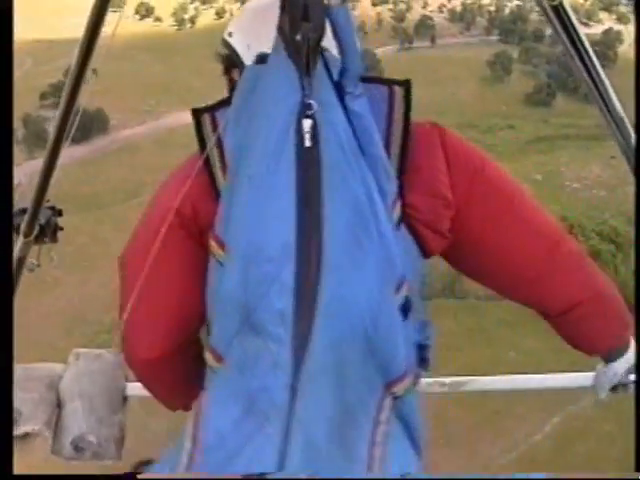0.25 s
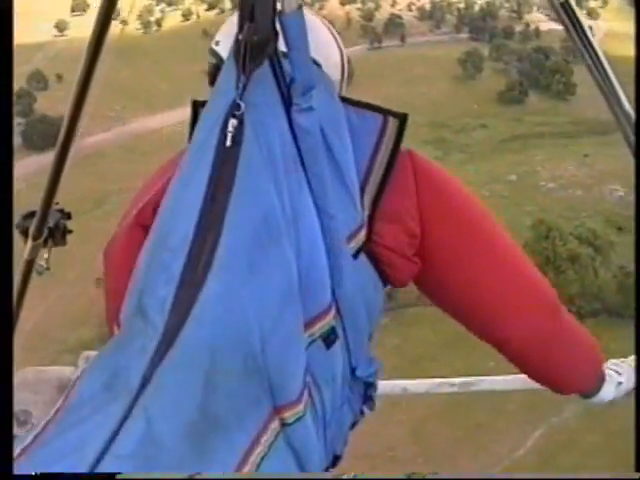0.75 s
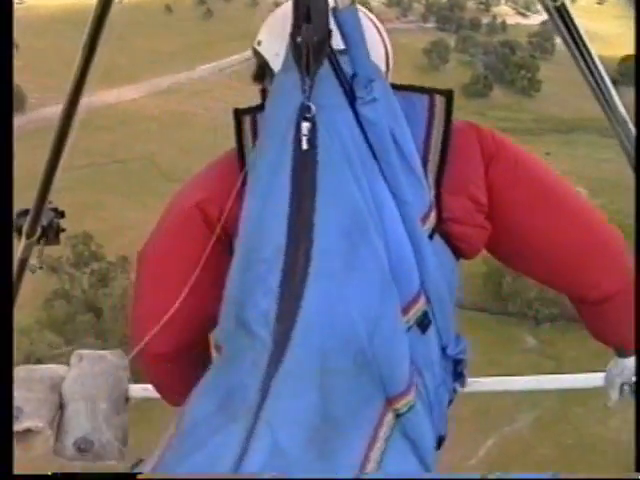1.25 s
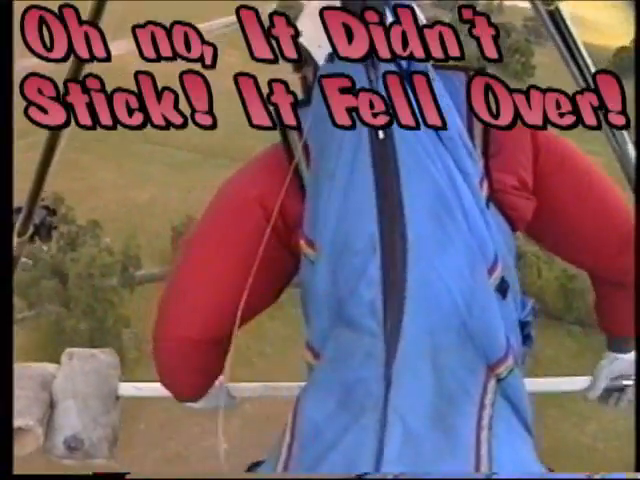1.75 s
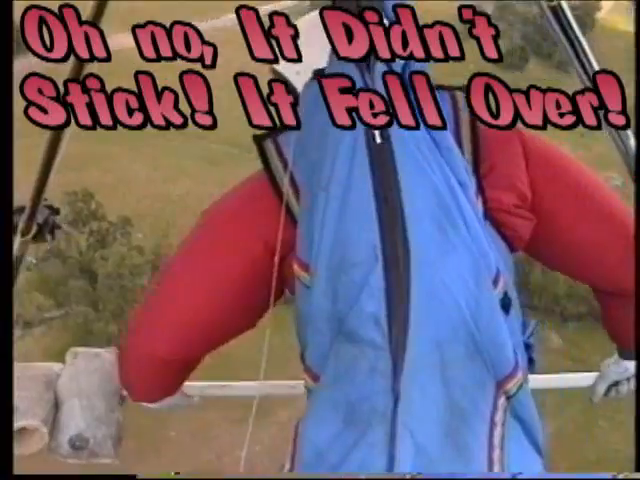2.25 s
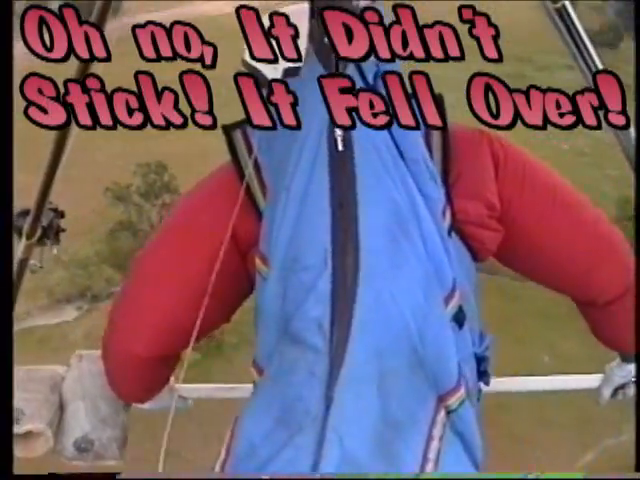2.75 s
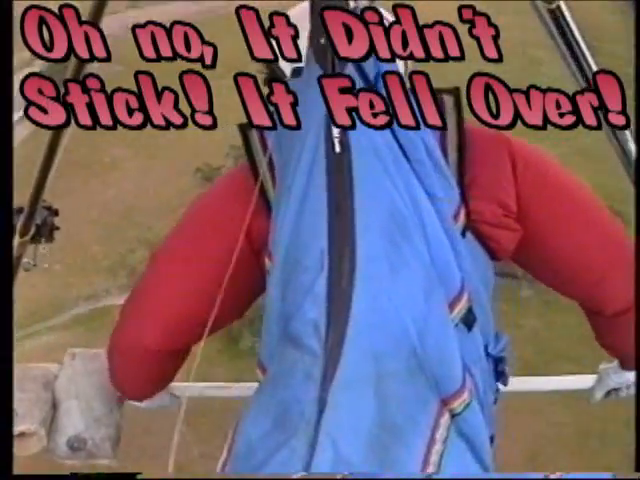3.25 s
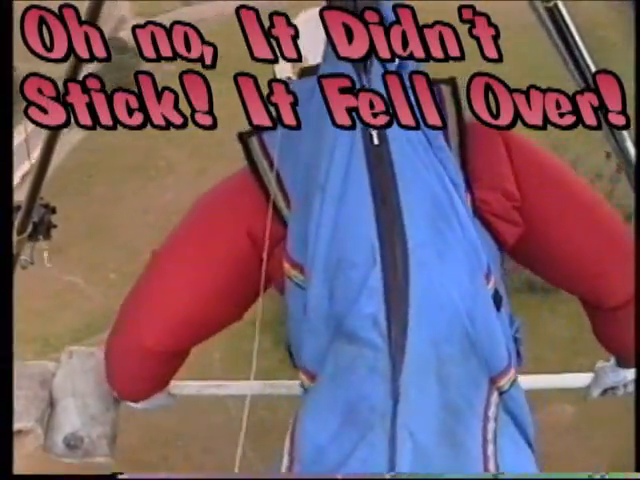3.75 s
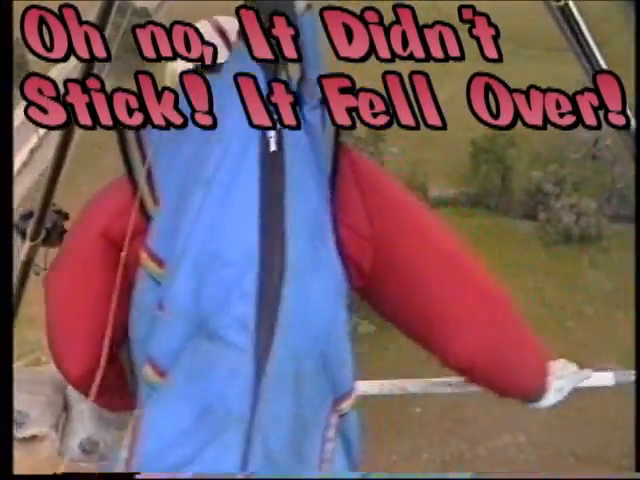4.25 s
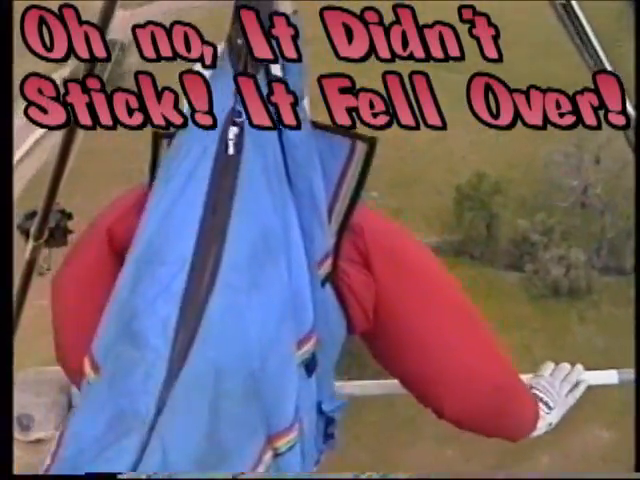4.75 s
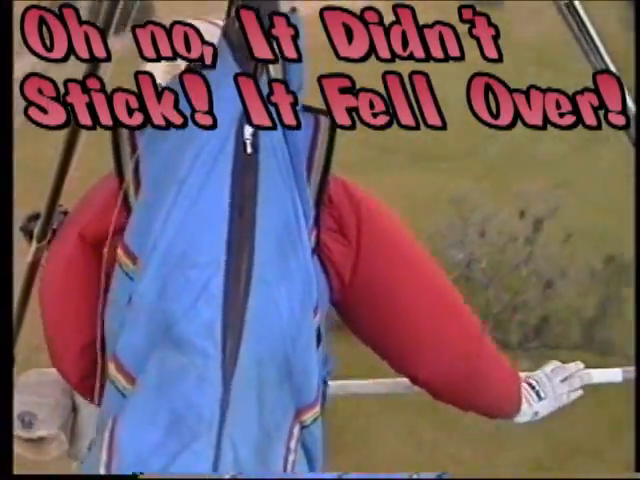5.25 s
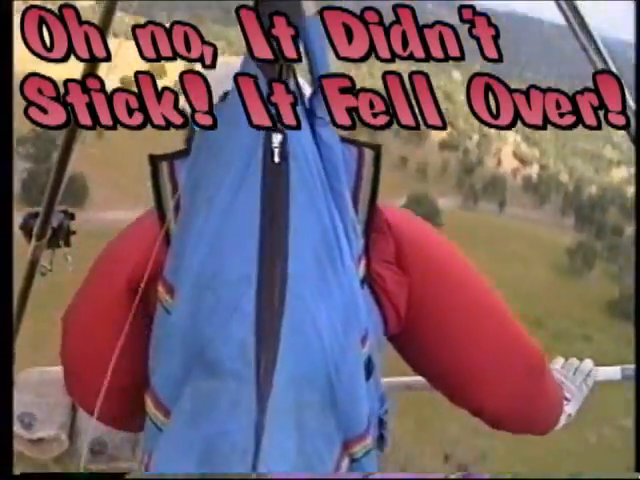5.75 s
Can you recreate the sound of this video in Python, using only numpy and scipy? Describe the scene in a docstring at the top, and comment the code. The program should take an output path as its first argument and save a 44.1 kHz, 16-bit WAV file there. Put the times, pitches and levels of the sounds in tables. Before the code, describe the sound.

Lumpy, overloaded wind rumble with hard thumps and bright ticks eases and surges again, before dropping away to whistling air over a glider frame.

```python
"""Wind on a microphone fixed behind the pilot of a hang glider in flight.
Eddies in the pilot's wake, noise shaped in bursts, beat on it: a lumpy rumble and a rough rush.
The rush brightens as the flow quickens; hard single eddies thump and small ticks ring the cavities.
Near the end the wake slips off, leaving a few lone buffets and the hiss of air over the frame, steady
filtered noise with broad, wavering tones from the rigging; its level rises after the slip."""
import sys
import numpy as np
from scipy import signal
from scipy.fft import rfft, irfft
from scipy.io import wavfile
from scipy.ndimage import uniform_filter1d, map_coordinates

SR = 44100
rng = np.random.default_rng(int(sys.argv[2]) if len(sys.argv) > 2 else 0)


def store_pcm(level_fs):
    """Save levels as 16-bit WAV."""
    pcm = np.round(np.clip(level_fs, -1, 1) * 32767).astype(np.int16)
    wavfile.write(sys.argv[1], SR, np.atleast_2d(pcm).T)


N = 265037
TIME = np.arange(N) / SR
FREQS = np.maximum(np.arange(N // 2 + 1) * SR / N, 1)

# the wake slips off the microphone at this moment, and this quickly
SLIP_S, SLIP_LENGTH_S = 5.35, 0.018

# relative pressure spectrum of the turbulence: [freq_hz, density_db]
TURBULENCE = [(15, -12), (28, -10.5), (60, -1), (120, 1), (300, -3), (500, -7), (1000, -19), (2000, -31),
              (3500, -36), (5500, -38.5), (7000, -51.5), (8800, -66), (11000, -65.5), (14000, -81)]
# resonant cavities of the microphone: [freq_hz, width_hz, lift_db]
CAVITIES = [(5310, 430, 13.3), (9790, 600, 8)]
# hardest single eddies: [centre_s, level_db before smoothing, half_length_s, thump_top_hz]
BUFFETS = [(0.222, -14, 0.0008, 1200), (0.345, -13, 0.00081, 1200), (0.676, -7.5, 0.00062, 1000),
           (0.746, -9, 0.0015, 900), (0.783, -9, 0.00056, 1300), (0.844, -13, 0.002, 800),
           (0.981, -13, 0.0007, 1200), (1.06, -14.5, 0.0016, 1100), (1.143, -11, 0.00045, 1100),
           (1.229, -16, .0012, 700), (1.523, -20, .0007, 900), (1.582, -11.5, 0.00074, 900),
           (1.703, -17, 0.00068, 800), (2.009, -12, 0.001, 696), (2.133, -14.5, 0.0016, 600),
           (2.523, -11.5, .0006, 800), (3.566, -9, 0.001, 1200), (3.729, -12.5, .0005, 1400),
           (3.828, -13, 0.0006, 1500), (4.073, -13, 0.0009, 1300), (4.198, -15, 0.00052, 1100),
           (4.578, -9, 0.00059, 1410), (4.782, -10.5, 0.0007, 1000), (4.907, -25, 0.00063, 1400),
           (4.966, -17, 0.00056, 1500), (5.023, -9.5, 0.00062, 1200), (5.134, -10.5, 0.0011, 900),
           (5.232, -10, 0.00083, 900), (5.325, -20, 0.0006, 800), (5.347, -12.5, 0.0017, 700),
           (5.471, -17.5, 0.0011, 600), (5.481, -17, 0.00031, 1100), (5.498, -11.5, 0.0015, 550),
           (5.557, -21.5, 0.0023, 200), (5.606, -12, 0.0021, 450), (5.649, -12, 0.00062, 720),
           (5.667, -22.5, 0.0029, 250), (5.708, -20, 0.0014, 350), (5.715, -23.5, 0.00033, 800),
           (5.755, -18, 0.0011, 400), (5.764, -26, .001, 350), (5.957, -26.5, 0.0042, 200),
           (5.995, -19, 0.0021, 200)]


def wake(deep_hz=68, large_hz=330, small_hz=650, fine_hz=1200):
    """Large eddies break up into small ones, so all sizes share their bursts; each has its own level."""
    # flow speed, as a level whose mean is taken out: [time_s, level_db]
    flow_rows = [(0.0, -31.5), (0.25, -39), (0.42, -33.5), (0.58, -35), (0.68, -31), (0.88, -35.5),
                 (1.15, -40), (1.4, -44.5), (1.65, -42), (1.95, -45), (2.2, -41.5), (2.8, -42), (3.19, -37),
                 (3.25, -33), (3.45, -35), (3.9, -30), (4.11, -36), (4.27, -32.5), (4.9, -33), (5.05, -35),
                 (5.34, -44.5)]
    # level of the rumble: [time_s, level_db]
    rumble_rows = [(0, -20), (1.2, -21.5), (2.0, -20.5), (2.7, -18.5), (3.3, -22), (4.2, -20), (4.65, -25),
                   (5.0, -20), (5.3, -22)]
    # level of the deep bass: [time_s, level_db]
    deep_rows = [(0, -35.5), (0.28, -28), (0.6, -31), (0.85, -31), (1.05, -34), (1.25, -24.5), (1.42, -34),
                 (1.8, -24), (2.2, -30), (2.7, -23.5), (3.5, -31.5), (3.9, -28.5), (4.4, -36.5),
                 (5.0, -30.5), (5.28, -23), (5.42, -35.5), (5.82, -36.5), (6.0, -34.5)]
    # short gusts that swell the rumble: [centre_s, half_length_s, gain_db]
    gust_rows = [(0.21, .02, 0.5), (0.42, 0.023, 0), (0.91, .015, 5.5), (1.215, 0.035, 4),
                 (1.365, .02, 4.5), (1.58, 0.016, 2.5), (1.703, 0.027, 2.5), (2.371, 0.014, 2),
                 (2.737, .025, 2.5), (4.16, 0.023, 3), (4.705, 0.016, 4.5), (5.14, .025, 3.5)]
    # short lulls between them: [centre_s, half_length_s, loss_db]
    lull_rows = [(0.157, .018, 6.5), (0.365, 0.009, 2), (0.625, .035, 6), (1.335, .01, 3),
                 (1.435, 0.058, 4.5), (1.622, 0.016, 3.5), (1.77, 0.01, 3), (2.18, 0.086, 3),
                 (2.407, 0.014, 8), (2.55, 0.0076, 6.5), (2.77, 0.014, 3), (2.85, 0.0077, 4.5),
                 (3.272, 0.018, 5.5), (4.009, 0.014, 5.5), (4.753, .016, 5)]
    burst_calming = 0.18  # faster flow evens out the bursts: dB of their depth per dB of flow
    middle_mean_db, middle_swell = -26.5, 0.35  # level at the mean flow; dB gained per dB of flow
    middle_lumps = 0.55  # share of the gusts and lulls that the middle eddies follow
    large_waver_db, middle_waver_db = 1.62, 1.0  # chance wavering
    large_loss_db, middle_loss_db = 16.5, 16  # lost once the wake is off

    flow_db, = in_time(flow_rows)
    flow_db = flow_db - flow_db.mean()
    # larger eddies follow only the slow trend of the flow
    speed_db = uniform_filter1d(flow_db, size=SR // 3)
    rumble_db, = in_time(rumble_rows)
    deep_db, = in_time(deep_rows)
    lumps_db = swells(gust_rows) - swells(lull_rows)
    bursts = rms_one(drift(rate=210) + 0.34 * drift(rate=180)).clip(-2.0, 2.0)
    bursts = bursts * from_db(-burst_calming * speed_db)

    deep = eddies(below(deep_hz), bursts, burst_db=2.0, steady_s=0.24)
    rumble = eddies(between(deep_hz, large_hz), bursts, burst_db=2.0, steady_s=0.27)
    large = evened(rumble + 1.45 * flaps() * (1 - slipped()), 0.062)
    roar = eddies(between(large_hz, small_hz), bursts, burst_db=3.0, steady_s=0.21)
    rush = eddies(between(small_hz, fine_hz), bursts, burst_db=3.0, steady_s=0.035)
    # faster flow moves the weight from roar to rush
    middle = evened(roar + rush * from_db(-5.5 + 0.6 * speed_db), 0.034)

    large_db = rumble_db + lumps_db + large_waver_db * drift(rate=60)
    middle_db = middle_mean_db + middle_swell * speed_db + middle_lumps * lumps_db
    middle_db = middle_db + middle_waver_db * drift(rate=16)
    low = large * from_db(large_db) * wake_left(large_loss_db)
    low = low + middle * from_db(middle_db) * wake_left(middle_loss_db)
    low = (low + deep * from_db(deep_db)) * room_for_thumps()

    front_top_hz = 420
    fronts = shaped(np.gradient(low), below(front_top_hz)).clip(-2.5, 2.5)
    fine = finest_eddies(fronts, bursts, flow_db, speed_db, lumps_db, fine_hz)
    return low + fine + sizzle(fronts)


def finest_eddies(fronts, bursts, flow_db, speed_db, lumps_db, fine_hz):
    """The finest eddies hiss, flaring on rising pressure fronts, more raggedly in slow flow."""
    # the hiss flares up for an instant: [centre_s, half_length_s, gain_db]
    flare_rows = [(0.07, 0.0084, 5), (0.845, 0.0033, 6.5), (0.989, 0.011, 4.5), (1.061, 0.0042, 7.5),
                  (1.148, .012, 3), (1.386, .005, 4), (2.696, 0.0036, 6), (2.997, 0.0039, 4),
                  (3.1, 0.014, 3), (3.613, 0.0056, 5.5), (5.182, 0.0045, 6), (5.233, 0.0045, 7),
                  (5.268, .004, 0)]
    # the hiss dips for an instant: [centre_s, half_length_s, loss_db]
    gap_rows = [(0.108, 0.0054, 3), (0.134, 0.0049, 7), (0.741, 0.0056, 8), (0.974, 0.004, 14),
                (1.05, 0.0054, 8), (1.073, 0.0059, 10), (2.77, 0.015, 4), (3.023, 0.0055, 8),
                (3.148, 0.0052, 14), (3.196, 0.018, 3.5), (5.055, 0.0028, 16), (5.129, 0.0054, 12),
                (5.213, .004, 9)]
    front_db, front_calming = 1, 0.28  # flare on a typical front; its weakening in dB per dB of flow
    treble_swell, treble_hz = 0.42, 6300  # extra dB per dB of flow, from this frequency up
    mean_db, swell = -37, 1  # level at the mean flow; dB gained per dB of flow
    lump_share, waver_db, loss_db = 0.4, 1.31, 4  # share of gusts and lulls; chance; loss at the slip

    fine = eddies(1 - below(fine_hz), bursts, burst_db=1.6, steady_s=0.061)
    flare_db = front_db * fronts * from_db(-front_calming * speed_db)
    fine = evened(fine * from_db(flare_db), 0.11) + from_db(-28) * crackle()
    dull = irfft(rfft(fine) * below(treble_hz), N)
    fine = dull + (fine - dull) * from_db(treble_swell * speed_db)
    fine_db = mean_db + swell * flow_db + lump_share * lumps_db
    fine_db = fine_db + swells(flare_rows) - swells(gap_rows) + waver_db * drift(rate=64)
    return fine * from_db(fine_db) * wake_left(loss_db)


def eddies(share, bursts, burst_db, steady_s):
    """Turbulent pressure of one range of eddy sizes comes in bursts and rings the microphone's cavities."""
    pressure = rng.standard_normal(N) * from_db(burst_db * bursts)
    response = colour(TURBULENCE) * resonances(CAVITIES) * np.sqrt(share)
    return evened(shaped(pressure, response), steady_s)


def flaps(per_s=18, half_length_s=0.00085):
    """Compact eddies arrive at random, each a suction and a push."""
    clicks = (rng.random(N) < per_s / SR) * rng.uniform(0.33, 1.16, N)
    return signal.fftconvolve(clicks, snap(np.arange(-600, 601) / SR / half_length_s), "same")


def snap(u):
    """An eddy sucks at the diaphragm, then snaps over into a push; u is time in half lengths."""
    pulse = np.tanh(3 * u) / np.cosh(np.clip(u, -40, 40))
    return pulse / np.abs(pulse).max()


def crackle(per_s=14, low_hz=4500, high_hz=7000):
    """Short bright grains crackle in the treble at random, as from an overloaded microphone; unit power."""
    clicks = (rng.random(N) < per_s / SR) * rng.uniform(0.35, 1, N)
    grains = np.convolve(clicks, np.hanning(SR // 600), "same") * rng.standard_normal(N)
    response = np.sqrt(between(low_hz, high_hz)) * colour(TURBULENCE) ** 0.36 * resonances(CAVITIES)
    return shaped(grains, response)


def sizzle(fronts, level_db=-82, front_db=4.5, low_hz=9500, high_hz=14000):
    """A faint airy sizzle at the very top, spitting on the steepest rising fronts."""
    spitting = rng.standard_normal(N) * from_db(front_db * fronts)
    return from_db(level_db) * shaped(spitting, np.sqrt(between(low_hz, high_hz)))


def slipped():
    """How far the wake has left the microphone, 0-1."""
    return np.clip((TIME - SLIP_S) / SLIP_LENGTH_S, 0, 1)


def wake_left(loss_db, patch_s=0.015, full_patch_db=1.5):
    """Gain of the wake: full until it slips off, then faint but for a patch dragged along by each buffet."""
    # a buffet at full_patch_db would bring all of the wake back
    patches = swells((s, patch_s, from_db(db - full_patch_db)) for s, db, *_ in BUFFETS)
    return np.minimum(from_db(-loss_db * slipped()) + patches, 1)


def room_for_thumps(half_length_s=0.0015, loss_db=7):
    """The low wake noise dips briefly under each hard thump, leaving room for it."""
    return from_db(-swells((s, half_length_s, loss_db) for s, *_ in BUFFETS))


def buffets():
    """Single hard eddies thump on the microphone, each smoothed by its own low-pass."""
    thumps = np.zeros(N)
    for centre_s, level_db, half_length_s, top_hz in BUFFETS:
        smoothing = signal.butter(3, top_hz, fs=SR, output="sos")
        pulse = snap((TIME - centre_s) / half_length_s)
        thumps += from_db(level_db) * signal.sosfiltfilt(smoothing, pulse)
    return thumps


def ticks(length_s=0.00094, centre_hz=5600, width_hz=1500, skirt=.14):
    """Brief bright ticks with a faint broad skirt, ringing in the microphone's cavities."""
    # small ticks at the microphone: [centre_s, level_db]
    tick_rows = [(0.32, -31), (0.806, -28), (0.906, -24), (1.004, -28), (2.17, -24.5), (2.674, -34),
                 (2.825, -36), (4.248, -21)]
    band = 1 / (1 + ((FREQS - centre_hz) / width_hz) ** 4) + skirt * between(1500, 8000)
    grain = evened(shaped(rng.standard_normal(N), resonances(CAVITIES) * band), 0.0033) / 2
    return grain * swells((s, length_s, from_db(db)) for s, db in tick_rows)


def airstream(waver_db=0.15, tone_waver_db=0.9, tone_db=-3.5, tone_rise_db_per_s=9, pitch_wander=.005):
    """Air hisses over frame and sail, and wires and tubes shed broad tones, each wavering by itself."""
    # relative spectrum of the hiss: [freq_hz, density_db]
    air_colour = [(100, 15.5), (450, -6.5), (850, -1), (1600, -10), (3000, -13), (4700, -16), (5700, -13),
                  (6250, -16.5), (6900, -27), (8500, -39.5), (14000, -48)]
    # broad tones of wires and tubes, before tone_db: [freq_hz, width_hz, lift_db]
    wire_rows = [(1050, 400, 10.5), (2220, 150, 5.5), (3130, 150, 3.5), (4040, 310, 11.5), (4340, 230, 14),
                 (5470, 200, 2.5), (6170, 330, 7), (7450, 280, 8.5)]
    # the open hiss swells or dips briefly: [centre_s, half_length_s, gain_db]
    wobble_rows = [(5.49, 0.031, 3), (5.585, 0.022, 3), (5.628, 0.014, -5)]
    sheltered_db, open_db = -60.5, -37  # level in the wake and in the open
    rise_db_per_s, opening_s = 4.5, 0.14  # rise after the slip; time to come through before it

    since_slip = TIME - SLIP_S
    opened = np.clip(1 + since_slip / opening_s, 0, 1)
    level_db = sheltered_db * (1 - opened) + (open_db + rise_db_per_s * since_slip) * opened
    plain = colour(air_colour) * resonances(CAVITIES)
    air = irfft(rfft(rng.standard_normal(N)) * plain, N)
    for wire in wire_rows:
        peak = np.sqrt(np.abs(resonances([wire]) ** 2 - 1))
        tone = irfft(rfft(rng.standard_normal(N)) * plain * peak, N)
        # reading at an uneven pace makes the pitch wander
        pace = 1 + pitch_wander * drift(rate=6)
        tone = map_coordinates(tone, [np.cumsum(pace)], order=3, mode="mirror")
        # after the slip the tones come forward against the hiss
        rise_db = tone_rise_db_per_s * since_slip.clip(0)
        air += tone * from_db(tone_db + rise_db + tone_waver_db * drift(rate=5.1))
    return rms_one(air) * from_db(level_db + waver_db * drift(rate=30) + swells(wobble_rows))


def from_db(db):
    """Decibels to gain."""
    return 10 ** (np.asarray(db) / 20)


def rms_one(x):
    """Scale to unit power."""
    return x / np.sqrt(np.mean(x ** 2) + 1e-20)


def in_time(rows):
    """Each column of a curve at every sample."""
    s, *columns = np.transpose(rows)
    return [np.interp(TIME, s, c) for c in columns]


def swells(rows):
    """A sum of brief smooth bumps from rows of (time, half length, height)."""
    return sum(height * np.exp(-((TIME - s) / half_length) ** 2) for s, half_length, height in rows)


def colour(points):
    """Gain at every frequency from a short spectrum."""
    hz, db = np.transpose(points)
    return from_db(np.interp(np.log(FREQS), np.log(hz), db))


def resonances(modes):
    """Gain of a few peaks standing on a flat response."""
    added_power = sum((from_db(db) ** 2 - 1) / (1 + (2 * (FREQS - hz) / width) ** 2)
                      for hz, width, db in modes)
    return np.sqrt(1 + added_power.clip(-.5))


def below(edge_hz):
    """Soft low-pass curve: the share on the low side of a crossover."""
    return 1 / (1 + (FREQS / edge_hz) ** 6)


def between(low_hz, high_hz):
    """Soft band-pass curve: the share between two crossovers."""
    return below(high_hz) * (1 - below(low_hz))


def shaped(x, response):
    """Filter by a frequency response; unit power."""
    return rms_one(irfft(rfft(x) * response, N))


def drift(rate):
    """Slow chance with a spread of 1, changing about rate times a second."""
    return shaped(rng.standard_normal(N), 1 / (1 + (FREQS / rate) ** 2))


def evened(x, seconds):
    """Hold the power steady over spans longer than the given one."""
    size = max(int(seconds * SR), 2)
    power = uniform_filter1d(uniform_filter1d(x ** 2, size), size)
    return x / np.sqrt(power + 1e-12)


def scene():
    """One microphone feeds both channels, the right a touch fuller in the bass."""
    # level of left over right: [freq_hz, difference_db]
    balance_rows = [(25, -.65), (250, -.52), (600, -.3), (1100, -.04)]
    mono = rfft(wake() + buffets() + ticks() + airstream())
    lean = np.sqrt(colour(balance_rows))  # half the difference on each side
    return irfft(mono * [lean, 1 / lean], N)


def record(dry, suction_ceiling=0.49, push_ceiling=0.58, hiss_db=-78, cutoff_hz=15700):
    """Big low swings overload the microphone, suction first, and choke the hiss riding on them."""
    low = signal.sosfiltfilt(signal.butter(2, 2200, fs=SR, output="sos"), dry)
    load = 1 + (low / np.where(low < 0, suction_ceiling, push_ceiling)) ** 6
    rounded = (low + (dry - low) / load) / load ** (1 / 6)
    # each channel adds its own faint hiss
    hiss = np.array([shaped(rng.standard_normal(N), np.sqrt(below(9000))) for side in "LR"])
    soft_ends = np.clip(np.minimum(TIME, TIME[::-1]) / .002, 0, 1)
    out = (rounded + from_db(hiss_db) * hiss) * soft_ends
    return signal.sosfilt(signal.cheby2(12, 70, cutoff_hz, fs=SR, output="sos"), out)


dry = scene()
out = record(dry)
store_pcm(out)
```